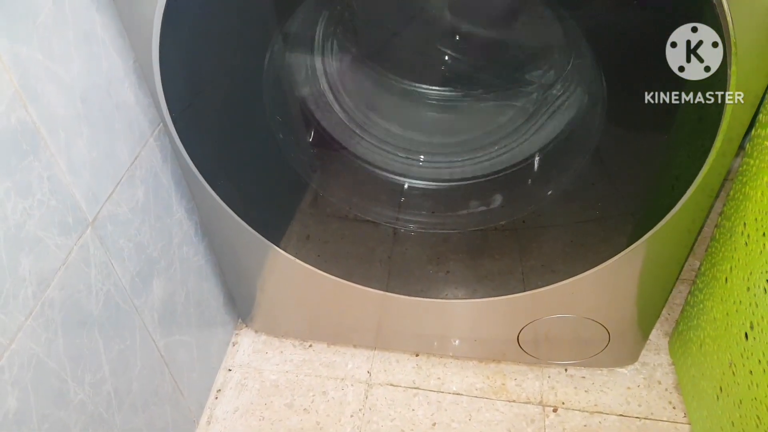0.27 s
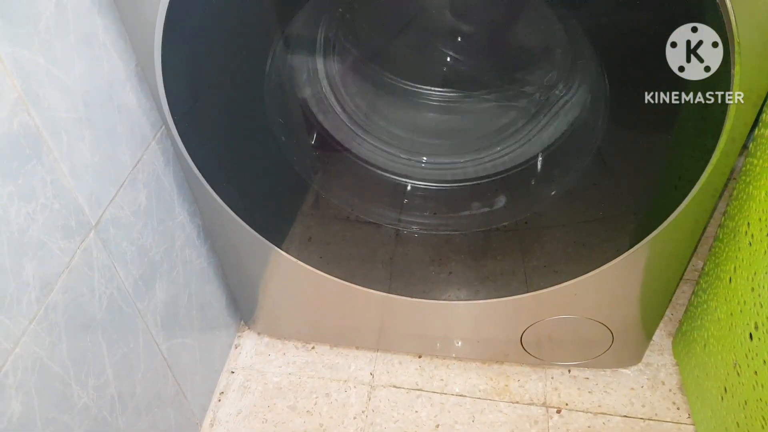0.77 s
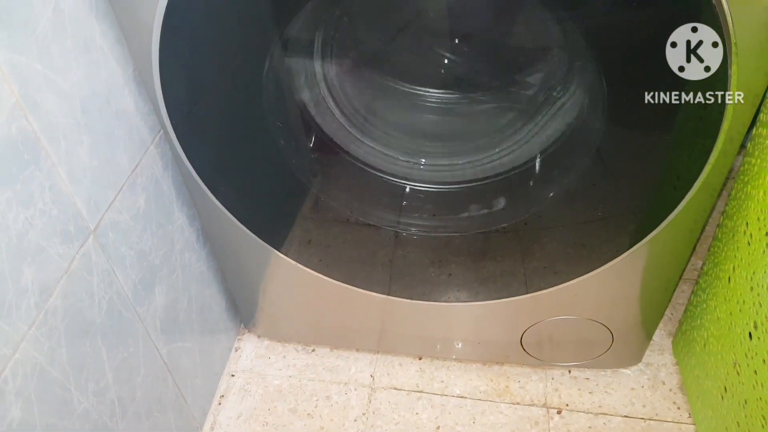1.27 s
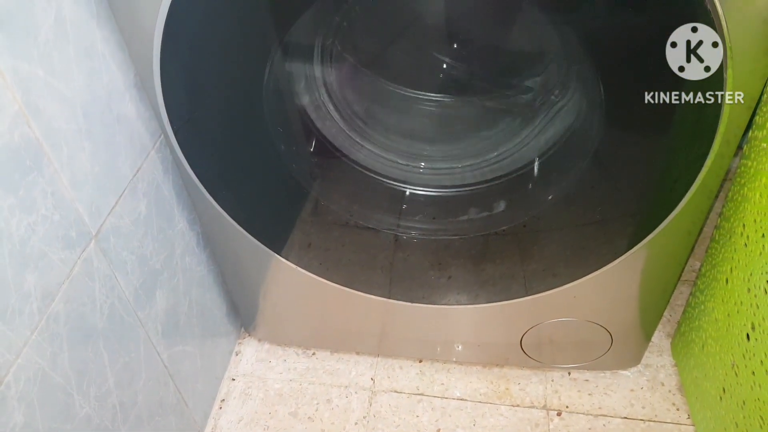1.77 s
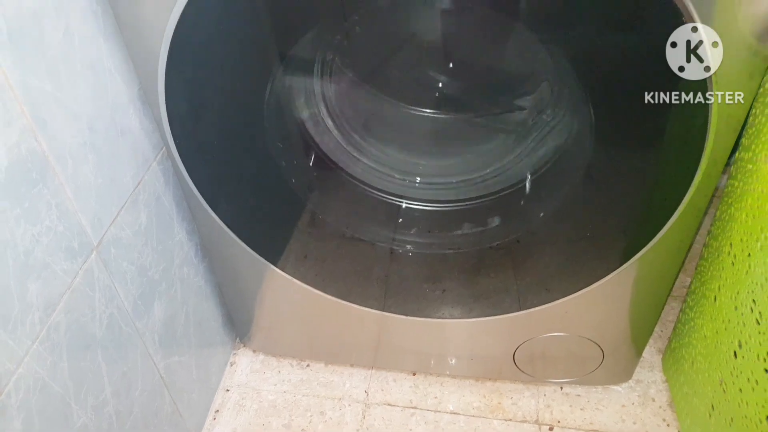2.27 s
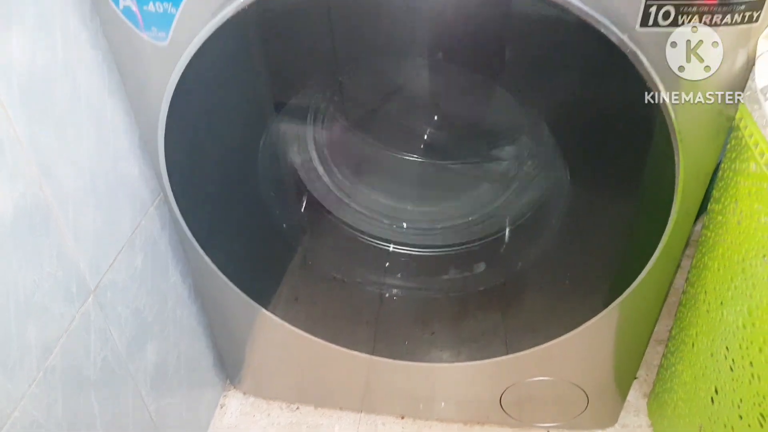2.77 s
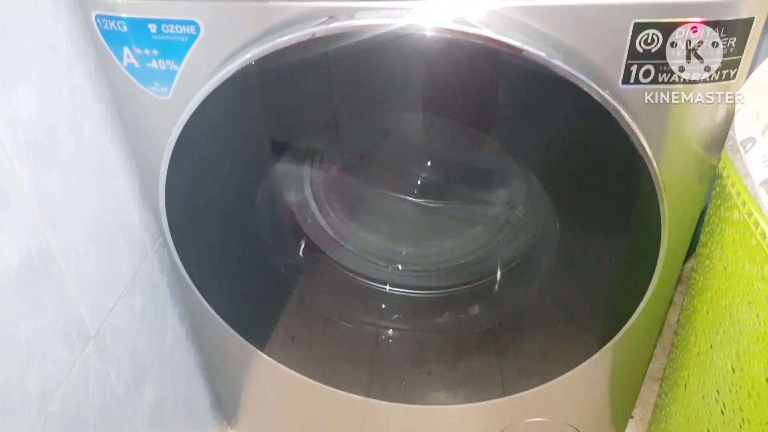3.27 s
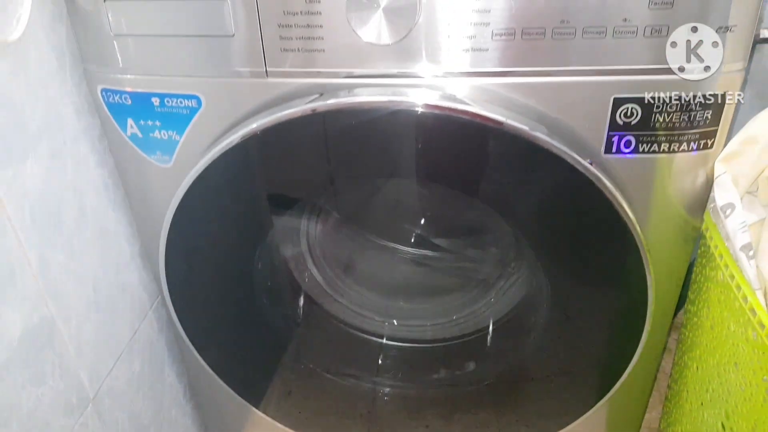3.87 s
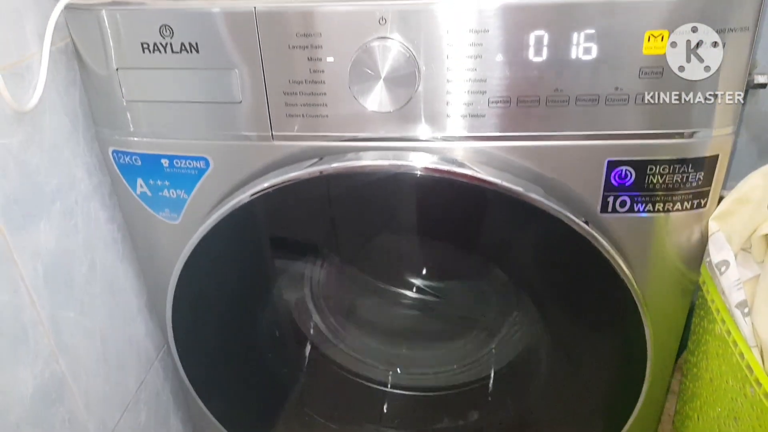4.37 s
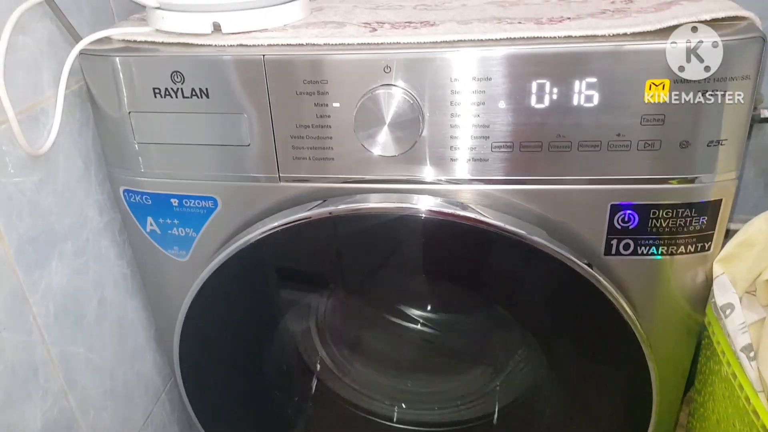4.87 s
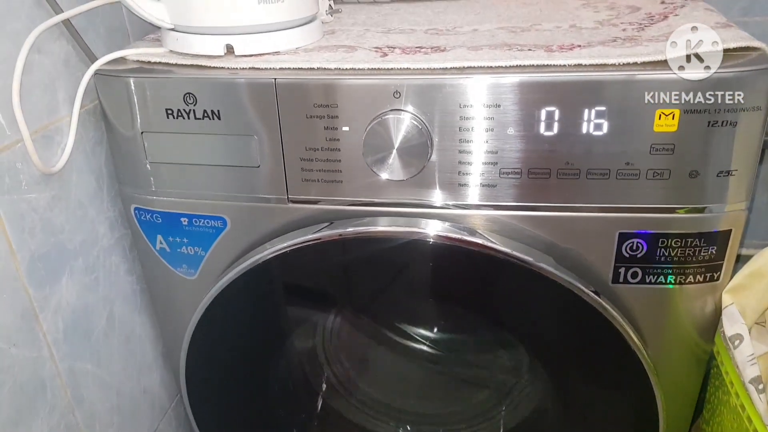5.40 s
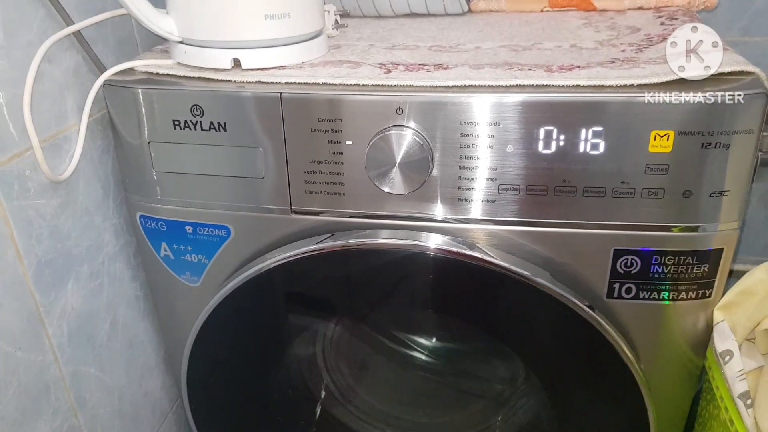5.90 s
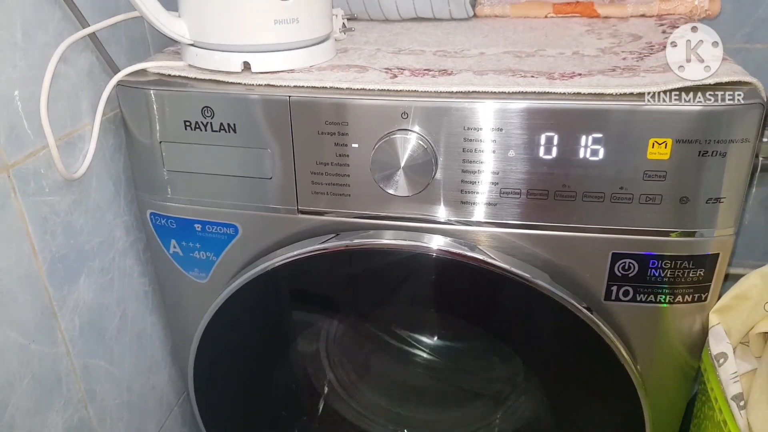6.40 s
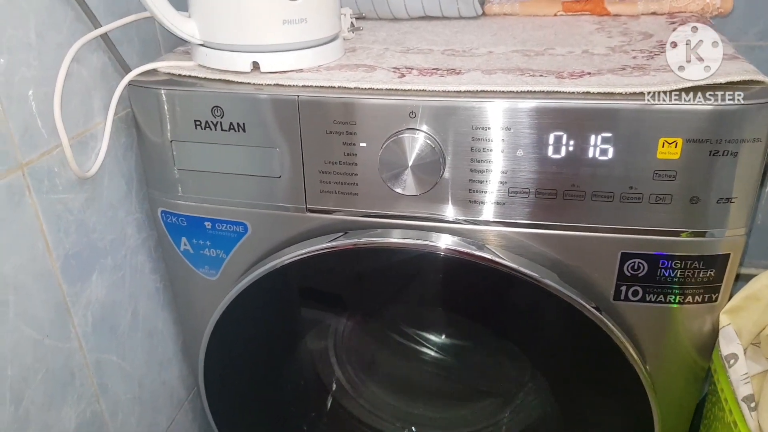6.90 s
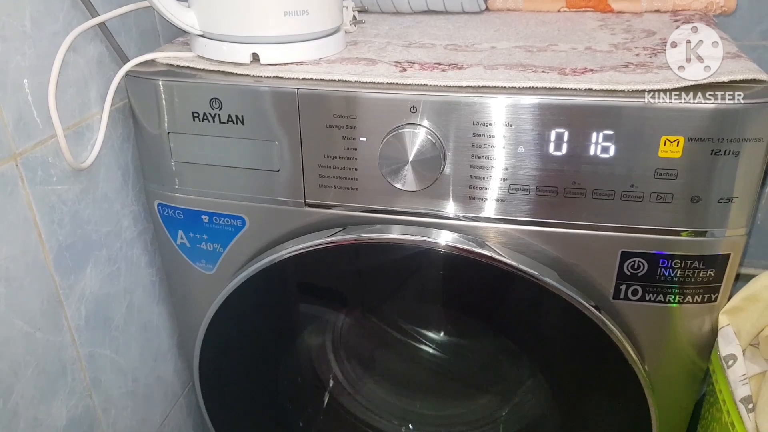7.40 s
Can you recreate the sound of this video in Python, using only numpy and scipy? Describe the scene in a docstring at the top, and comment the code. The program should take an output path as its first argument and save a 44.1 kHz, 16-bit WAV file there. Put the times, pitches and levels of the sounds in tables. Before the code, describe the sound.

Loud, even washer spin up close: low droning cabinet hum, buzzing rattle and thin whine, with two faint cloth swishes and one dull microphone tap.

```python
"""In a small tiled room, a front-loading washing machine spins steadily.
Its lopsided drum shakes the cabinet into a deep hum, built from sines at multiples of the drum speed.
A belt-driven motor and its drive add whining sines; shaped noise makes the rumble, scuffs and hiss.
The hand-held microphone rises from near the door to the control panel.
A sleeve brushes by twice, as a rising swish of noise, and a finger taps the microphone once."""
import sys
import numpy as np
from scipy import signal
from scipy.fft import rfft, irfft, next_fast_len
from scipy.io import wavfile

SR = 44100
rng = np.random.default_rng(int(sys.argv[2]) if len(sys.argv) > 2 else 0)


def wav_record(signal):
    """Record a signal, one row per channel, as 16-bit PCM in the file named by sys.argv[1]."""
    frames = np.transpose(np.atleast_2d(signal))
    bounded = np.clip(frames, -1, 1)
    # unit amplitude maps onto the largest positive 16-bit level
    quanta = np.round(bounded * 32767).astype(np.int16)
    wavfile.write(sys.argv[1], SR, quanta)


N = 337365
TIME = np.arange(N) / SR  # seconds

# turns per second of the drum, the motor shaft and the belt
DRUM_HZ, MOTOR_HZ, BELT_HZ = 13.82, 157.62, 10.37


def amp(db):
    """Turns decibels into a gain."""
    return 10 ** (np.asarray(db) / 20)


def evened(x):
    """Scales a sound to an rms (average strength) of 1."""
    return x / np.sqrt(np.mean(x ** 2) + 1e-20)


def bell(x, centre, reach):
    """A smooth hump of height 1."""
    return np.exp(-((x - centre) / reach) ** 2)


def read(points, hz, axis=1):
    """Reads one column of a frequency table, joining its points on a log-frequency axis."""
    columns = np.transpose(points)
    return np.interp(np.log(hz + 1), np.log(columns[0] + 1), columns[axis])


def drift(rate_hz):
    """Smooth random wandering of rms 1, with about rate_hz random values a second."""
    count = int(np.clip(rate_hz * TIME[-1], 4, 2048))
    knots = rng.standard_normal(count)
    smooth = signal.resample(knots, 16 * count)
    knot_times = np.linspace(0, TIME[-1], len(smooth))
    return evened(np.interp(TIME, knot_times, smooth))


def placed(lean_db):
    """Left and right gains with a mean power of 1; positive leans to the left."""
    pair = amp(np.array([lean_db, -lean_db]).reshape(2, -1) / 2)
    return pair / np.sqrt(np.mean(pair ** 2, axis=0))


def heard(door_db, panel_db, height):
    """Gain of a tone as the microphone moves through the room's standing waves."""
    door, panel = amp(door_db), amp(panel_db)
    return door + (panel - door) * height


# How alike the left and right channels are.
# Each row: frequency in Hz, likeness from 0 (unrelated) to 1 (the same).
LIKENESS = [(60, 1), (130, 0.98), (290, 0.96), (640, 0.63), (1000, 0.2), (1400, 0), (15000, 0.013)]


def half_shift(hz):
    """Half the angle in radians between the channels: wider where they are less alike."""
    return np.arccos(np.clip(read(LIKENESS, hz), -1, 1)) / 2


def tone(turns, hz):
    """A sine of rms 1; the room shifts its phase between the channels more at high frequencies."""
    apart = half_shift(hz) * rng.choice([-1, 1])
    angle = (2 * np.pi * (turns % 1)).astype(np.float32)
    return np.sqrt(2) * np.sin(angle + np.float32([[apart], [-apart]]))


# How noise leans to one side.
# Each row: frequency in Hz, left over right in dB.
NOISE_LEAN = [(380, -0.5), (700, -1.5), (1500, -5), (2400, -0.5), (4400, -1.5), (6000, 1.5), (8000, 7),
              (12500, 3.5), (13400, 15), (15000, 19)]


def noise(table, height, top_hz):
    """Two-channel noise whose colour passes from the door's to the panel's."""
    size = next_fast_len(N)
    hz = np.fft.rfftfreq(size, 1 / SR)
    first, second = rfft(rng.standard_normal((2, size)))
    same = np.clip(read(LIKENESS, hz), -1, 1)
    # the right channel shares part of the left one's noise
    right = same * first + np.sqrt(1 - same ** 2) * second
    spectrum = np.array([first, right]) * placed(read(NOISE_LEAN, hz))
    spectrum *= np.sqrt(SR / 2 / (1 + (hz / top_hz) ** 20))
    door = irfft(spectrum * amp(read(table, hz, axis=1)), size)[:, :N]
    panel = irfft(spectrum * amp(read(table, hz, axis=2)), size)[:, :N]
    return door + (panel - door) * height


# The cabinet's hum, shaken by the drum.
# Each row: multiple of the drum speed, level in dB at the door, level in dB at the panel.
DRUM_ORDERS = [(1, -55.7, -57.3), (2, -58.7, -53.9), (3, -44.4, -47.7), (4, -24.1, -22.6),
               (5, -28.8, -35.5), (6, -44.4, -40.4), (7, -23.1, -25.0), (8, -35.0, -38.9),
               (9, -45.8, -37.1), (10, -47.6, -46.6), (11, -36.8, -38.0), (12, -44.0, -44.0),
               (13, -33.7, -35.2), (14, -41.3, -45.0), (15, -37.1, -42.0), (16, -42.0, -44.1),
               (18, -54.5, -50.4), (19, -51.7, -51.3), (21, -46.9, -51.5), (22, -47.9, -51.5),
               (23, -52.0, -51.8), (24, -42.7, -39.0), (25, -50.4, -58.7), (26, -53.4, -57.4),
               (27, -47.0, -48.3), (28, -50.4, -56.4), (29, -55.6, -54.6), (30, -57.7, -57.1),
               (35, -52.8, -53.8), (36, -49.5, -52.9), (41, -49.1, -53.2)]
# in turns: where the load sits at the start, and how the cabinet delays its higher orders
LOAD_ANGLE, CABINET_LAG = .667, .1372
# the boom near 330 Hz beats slowly: beats per second, time of one crest in seconds, depth in dB
BEAT_HZ, BEAT_CREST_S, BEAT_DB = 0.78, 5.01, 1.5


def drum(height, waver=0.014, waver_per_hz=0.00083, boom_hz=332, boom_width_hz=8):
    """Each turn of the load shakes the cabinet alike; higher orders lag and waver more, the boom beats."""
    turns = DRUM_HZ * TIME - LOAD_ANGLE
    boom_db = BEAT_DB * np.cos(2 * np.pi * BEAT_HZ * (TIME - BEAT_CREST_S))
    out = np.zeros((2, N))
    for order, door_db, panel_db in DRUM_ORDERS:
        hz = order * DRUM_HZ
        if abs(hz - boom_hz) < boom_width_hz:
            wavering = amp(boom_db)
        else:
            depth = waver + waver_per_hz * hz
            wavering = (1 + depth * drift(3)) / np.sqrt(1 + depth ** 2)
        order_turns = order * turns + CABINET_LAG * order ** 2
        out += heard(door_db, panel_db, height) * wavering * tone(order_turns, hz)
    return out


# Noise of bearings and panels; the buzz also takes its colour from the door column.
# Each row: frequency in Hz, strength at the door and at the panel in dB per Hz, before later level changes.
RUMBLE_COLOUR = [(20, -68, -64), (40, -72, -66), (58, -54, -59), (101, -58, -59.5), (200, -56, -56),
                 (234, -62.5, -64.5), (408, -59, -60), (454, -64.5, -69), (705, -65.5, -66.0),
                 (890, -68.5, -68.5), (1281, -69.5, -73.5), (1290, -80.5, -82.5)]


def buzz(over_db=3.0, count=94):
    """A loose panel rattles the same way in every turn: a dense comb of high drum orders."""
    one_turn = np.zeros((2, 1025), complex)  # spectrum of a single turn
    orders = np.arange(count // 3, count)
    hz = orders * DRUM_HZ
    phase, side = rng.random((2, len(orders)))
    apart = half_shift(hz) * np.sign(side - .5)
    angles = 2 * np.pi * phase + np.array([apart, -apart])
    one_turn[:, orders] = amp(read(RUMBLE_COLOUR, hz) + over_db) * np.exp(1j * angles)
    shape = irfft(one_turn, norm="forward") / np.sqrt(2)
    places = np.linspace(0, 1, shape.shape[1], endpoint=False)
    # play that one turn over and over
    return np.array([np.interp(DRUM_HZ * TIME % 1, places, channel) for channel in shape])


# The motor's hum and whine.
# Each row: multiple of the shaft speed, level in dB at the door, level in dB at the panel, left over right in dB.
MOTOR_ORDERS = [(1, -32.5, -28, -0.1), (8, -57, -50.5, 0.5), (16, -49.5, -54.5, 3.3), (24, -63.5, -65, 4),
                (32, -78, -72, 13)]
# the whine has a dead spot in the room: height (0 door, 1 panel), reach in height, depth in dB
DEAD_HEIGHT, DEAD_REACH, DEAD_DB = 1, .035, -3.0


def motor(height, belt_sway=0.0096, belt_throb=0.11, flutter=0.41, jitter=0.0017):
    """The belt tugs the shaft once a lap, so the high whine warbles and flutters."""
    lap = 2 * np.pi * BELT_HZ * TIME
    dead_db = DEAD_DB * bell(height, DEAD_HEIGHT, DEAD_REACH)
    turns = MOTOR_HZ * TIME + belt_sway * np.sin(lap) + jitter * drift(60)
    out = np.zeros((2, N))
    for order, door_db, panel_db, lean_db in MOTOR_ORDERS:
        short_wave = min(order / 16, 1) ** 2  # the higher orders feel the dead spot and unrest more
        unrest = flutter * np.array([drift(70), drift(70)]) + belt_throb * np.cos(lap)
        level = heard(door_db, panel_db, height) * amp(short_wave * dead_db)
        level = level * (1 + short_wave * unrest)
        out += level * placed(lean_db) * tone(order * turns + rng.random(), order * MOTOR_HZ)
    return out


# Weaker tones of the drive.
# Each row: frequency in Hz, level in dB at the door, level in dB at the panel.
DRIVE_TONES = [(100, -45, -61), (129.9, -54, -50), (150, -45, -58), (154.8, -49, -47), (171.5, -45, -46),
               (268.2, -49, -54), (299.2, -49, -53), (304.2, -48, -60), (495.3, -53, -56),
               (505.7, -55, -52), (567.3, -52, -51), (577.7, -55, -54), (580.4, -57, -52), (1042, -57, -59)]


def drive(height, waver=0.22):
    """Mains hum and side tones of the drive beat against the drum's orders."""
    out = np.zeros((2, N))
    for hz, door_db, panel_db in DRIVE_TONES:
        level = heard(door_db, panel_db, height) * (1 + waver * drift(3))
        out += level * tone(hz * TIME + rng.random(), hz)
    return out


# Thin whistles of the motor and inverter.
# Each row: frequency in Hz, level in dB at the door, level in dB at the panel, left over right in dB.
WHISTLE_TONES = [(1687, -58, -61, -3.5), (3227, -65, -69, -31), (3200, -69, -64.5, -3),
                 (3410, -64.5, -67, 16), (5430, -77, -71, 9), (8290, -87, -92, 13), (12823, -71, -71, 7.5),
                 (14093, -75, -74, 17), (15353, -73, -79, 28)]


def whistles(height, width_hz=110, smear=0.16):
    """Narrow, fuzzy tones whose phase wanders."""
    out = np.zeros((2, N))
    for hz, door_db, panel_db, lean_db in WHISTLE_TONES:
        fuzzy = tone(hz * TIME + smear * drift(width_hz), hz)
        out += heard(door_db, panel_db, height) * placed(lean_db) * fuzzy
    return out


def rumble(height, shake, level_db=-1.0, chatter_db=2.2, throb_db=0.85):
    """Bearing noise swells once a turn and chatters when the cabinet swings furthest."""
    turn_db = throb_db * np.cos(2 * np.pi * (DRUM_HZ * TIME + 0.045))
    swing_db = chatter_db * (abs(shake) - 1)
    return noise(RUMBLE_COLOUR, height, top_hz=1390) * amp(level_db + turn_db + swing_db)


def scuff(order=66, width_hz=130, level_db=-48, grit=1.0, place=0.036, sharp=2.0):
    """Once a turn the lopsided drum brushes the door seal, and a panel answers with a gritty ring."""
    ring_hz = order * DRUM_HZ
    hz = np.fft.rfftfreq(N, 1 / SR)
    band = 1 / (1 + (2 * (hz - ring_hz) / width_hz) ** 4)
    scrape = irfft(rfft(rng.standard_normal((2, N))) * band, N)
    ring = tone(ring_hz * TIME, ring_hz) + grit * evened(scrape)
    contact = np.exp(sharp * np.cos(2 * np.pi * (DRUM_HZ * TIME - place)))
    return amp(level_db) * evened(ring * contact)


# Air and spray round the drum.
# Each row: frequency in Hz, strength at the door and at the panel in dB per Hz, before later level changes.
HISS_COLOUR = [(600, -103, -93), (1340, -78.5, -77.5), (1760, -76.5, -79.5), (2120, -81, -82.5),
               (3480, -85, -87.5), (5270, -87.5, -93.5), (6500, -96, -99), (7450, -104, -106),
               (8440, -103.3, -105.7), (9460, -95.5, -98), (10340, -92, -93.5), (12500, -95, -97),
               (13400, -99.5, -101), (15300, -103, -105)]


def hiss(height, level_db=-0.75, throb_db=0.9):
    """Air and spray sweep past the tub with each turn."""
    swell_db = throb_db * np.cos(2 * np.pi * (DRUM_HZ * TIME - .15))
    return noise(HISS_COLOUR, height, top_hz=19000) * amp(level_db + swell_db)


# A sleeve brushes past as the arm lifts.
# Each row: start in seconds, length in seconds, level in dB.
SLEEVE_BRUSHES = [(4.11, 0.12, -53), (4.98, 0.13, -43)]
# Fizz of the cloth's fibres.
# Each row: frequency in Hz, strength in dB per Hz compared with the swish.
FIBRE_FIZZ = [(1000, -41), (2200, -34), (4500, -47.5), (7500, -59), (10300, -46.5), (15000, -61)]
# the swish: starting pitch in Hz, rise in Hz per second, width in Hz
SWISH_HZ, SWISH_RISE_HZ_PER_S, SWISH_WIDTH_HZ = 2243, 7500, 740


def sleeve():
    """Cloth brushes by: a soft swish that rises as it speeds up, with a fizz of fibres."""
    hz = np.fft.rfftfreq(N, 1 / SR)
    soft, fine = rfft(rng.standard_normal((2, 2, N)))
    band = evened(irfft(soft / (1 + (2 * hz / SWISH_WIDTH_HZ) ** 2), N))
    fizz = irfft(fine * amp(read(FIBRE_FIZZ, hz)) * np.sqrt(SR / 2), N)
    out = np.zeros((2, N))
    for start, length, level_db in SLEEVE_BRUSHES:
        t = np.clip(TIME - start, 0, length)
        pitch_hz = SWISH_HZ + SWISH_RISE_HZ_PER_S * t
        # multiplying by a sine lifts the low noise up to the pitch
        swish = np.sqrt(2) * band * np.sin(2 * np.pi * np.cumsum(pitch_hz) / SR)
        envelope = np.sin(np.pi * (t / length) ** 0.66)
        out += amp(level_db) * envelope * (swish + fizz)
    return out


# A finger on the microphone's housing.
# Each row: time in seconds, level in dB.
FINGER_TAPS = [(6.831, -18)]
# What the housing rings with.
# Each row: frequency in Hz, level in dB compared with the tap, decay time in seconds.
HOUSING_RINGS = [(267, -15, 0.028), (392, -3.5, 0.013), (623, 0, 0.0013), (1390, -1.5, 0.00071),
                 (2400, -12, 0.00066)]


def taps(soft_s=0.00017):
    """A soft fingertip: a dull click, with a short thud of the housing behind it."""
    out = np.zeros(N)
    for start, level_db in FINGER_TAPS:
        t = np.maximum(TIME - start, 0)
        ring = np.zeros(N)
        for hz, db, decay_s in HOUSING_RINGS:
            ring += amp(db) * np.sin(2 * np.pi * hz * t) * np.exp(-t / decay_s)
        out -= amp(level_db) * ring * (1 - np.exp(-t / soft_s))
    return out


# The path of the microphone.
# Each row: time in seconds, height from 0 (at the door) to 1 (at the panel).
MIC_HEIGHT = [(0, 0.16), (1.9, .08), (4.2, 0.87), (6.0, 1), (7.65, .85)]
# the hand leans a little closer near the end: start and length in seconds, gain in dB
CLOSER_S, CLOSER_LENGTH_S, CLOSER_DB = 6.54, 0.58, 1.07


def scene():
    """The deep hum fills the room; the machine's other sounds grow as the microphone comes closer."""
    height = np.interp(TIME, *np.transpose(MIC_HEIGHT))
    closer = amp(CLOSER_DB * np.clip((TIME - CLOSER_S) / CLOSER_LENGTH_S, 0, 1))
    hum = drum(height)
    tones = buzz() + motor(height) + drive(height) + whistles(height)
    noises = rumble(height, evened(hum[0])) + scuff() + hiss(height)
    return hum + closer * (tones + noises) + sleeve() + taps()


def record(dry, edge_hz=15480):
    """Softens both ends, then cuts the treble above the recorder's band limit."""
    ends = signal.windows.tukey(N, 400 / N)
    band_limit = signal.firwin(1023, edge_hz, window=("kaiser", 9), fs=SR)
    return signal.oaconvolve(dry * ends, band_limit[None], "same")


dry = scene()
out = record(dry)
wav_record(out)
```